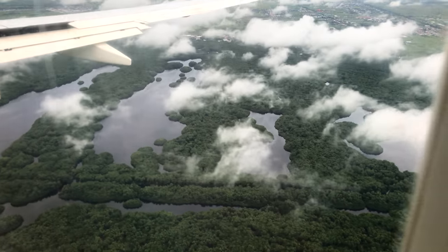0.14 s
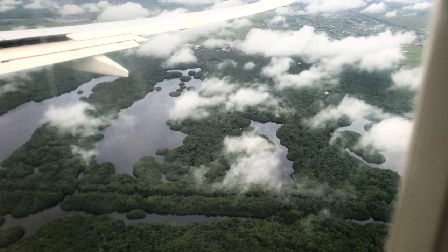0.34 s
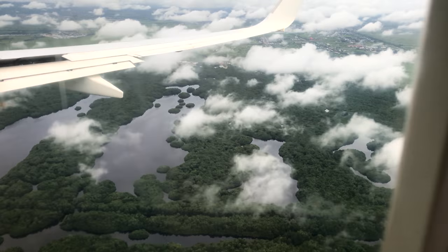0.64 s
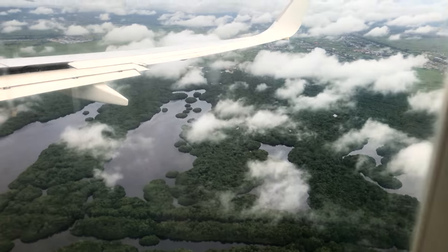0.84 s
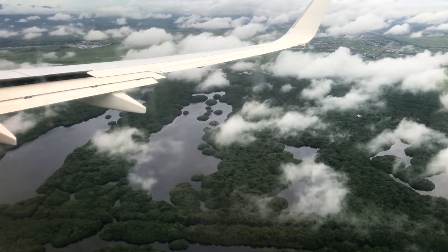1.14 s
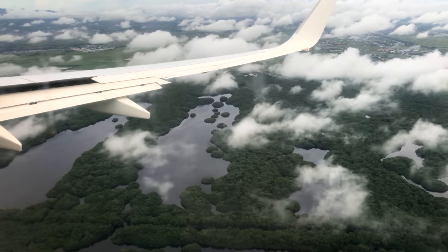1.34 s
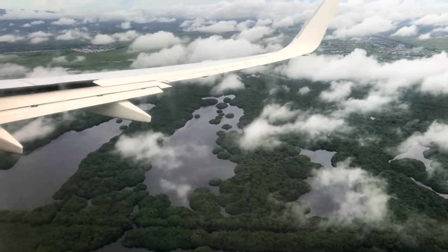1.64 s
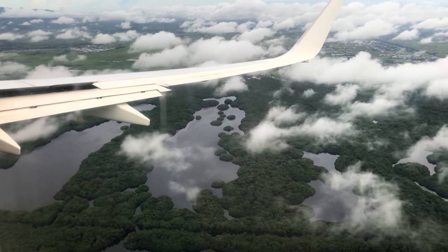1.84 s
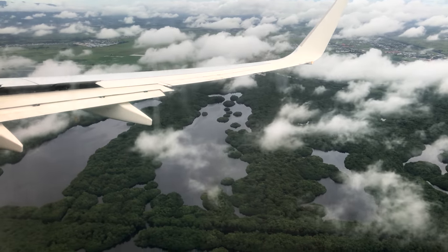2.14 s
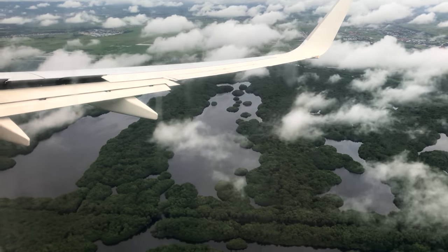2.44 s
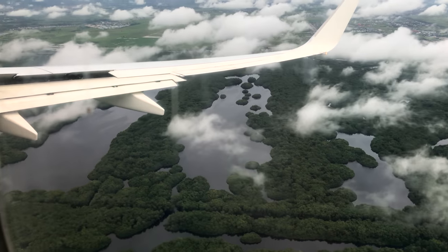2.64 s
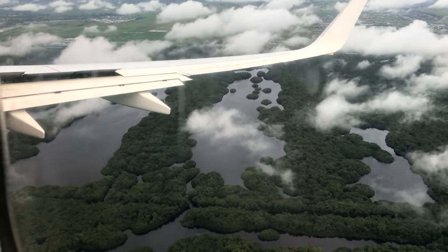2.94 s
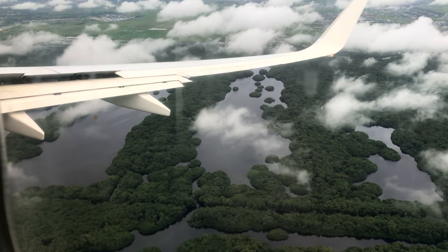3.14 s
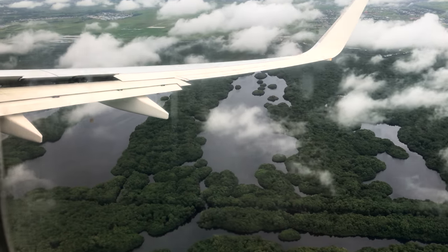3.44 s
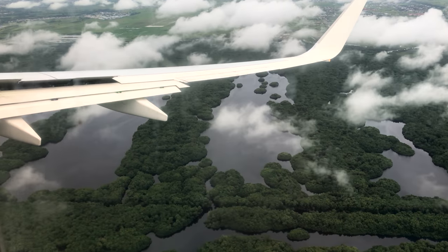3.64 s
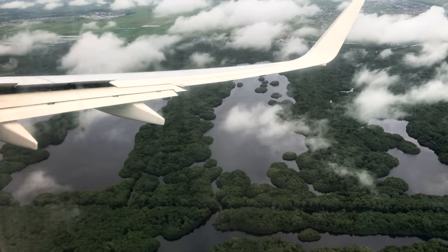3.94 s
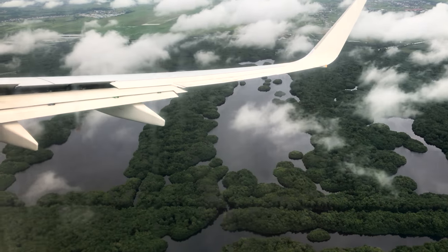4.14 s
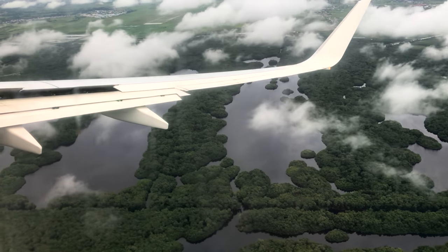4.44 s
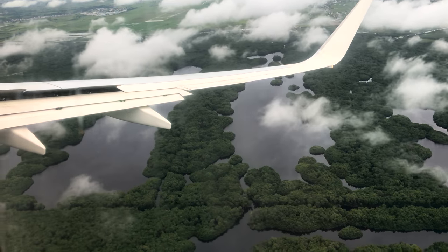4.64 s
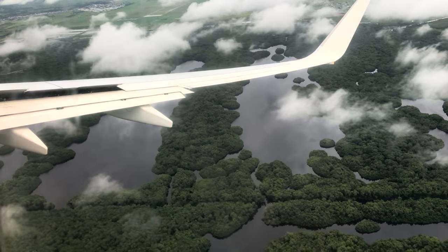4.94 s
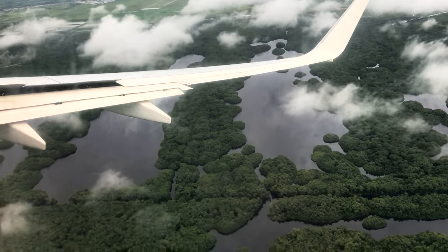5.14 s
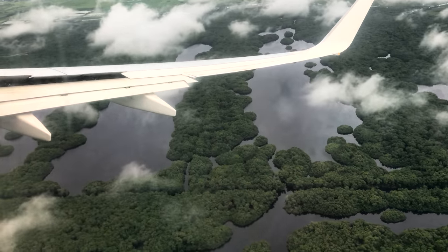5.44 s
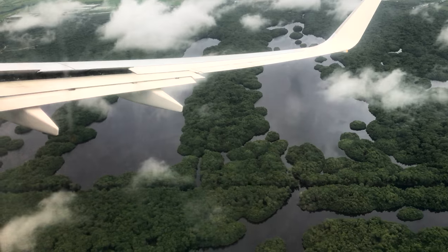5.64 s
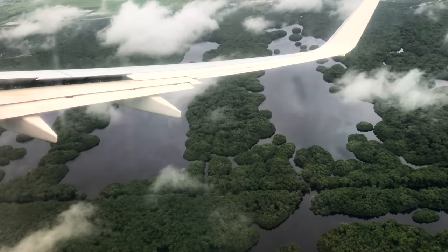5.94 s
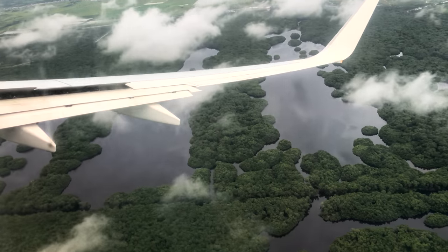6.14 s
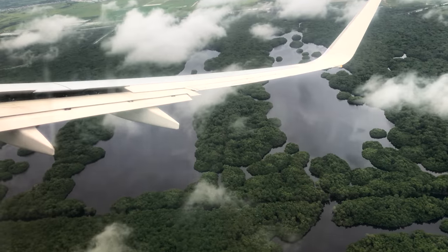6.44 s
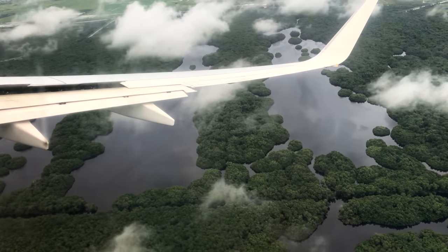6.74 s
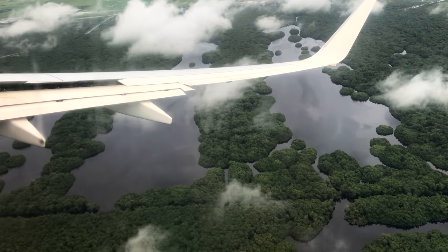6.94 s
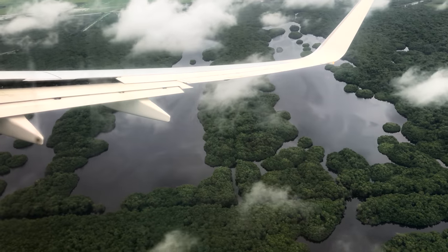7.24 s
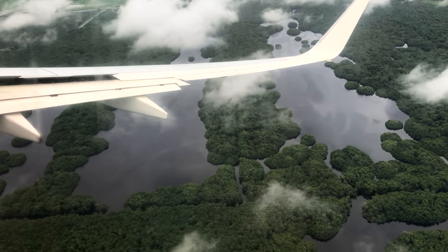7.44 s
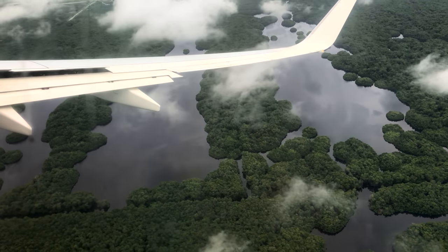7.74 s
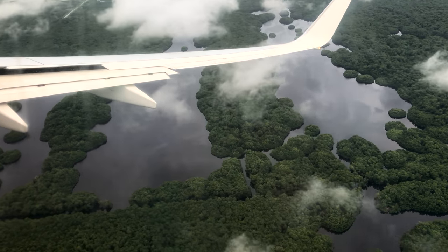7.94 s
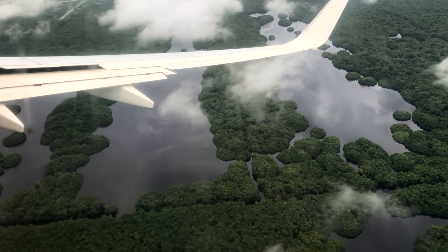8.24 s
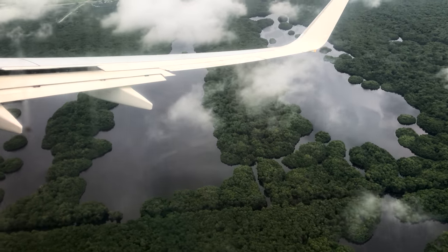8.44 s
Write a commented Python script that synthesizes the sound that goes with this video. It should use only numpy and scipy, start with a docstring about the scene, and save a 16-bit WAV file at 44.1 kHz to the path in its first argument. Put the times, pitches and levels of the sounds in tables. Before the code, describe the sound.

Throughout, a dense low jet roar fills the airliner cabin, with a deep boom around 50 hertz that wavers and beats slowly, soft mid-range rushing air and a faint buried engine hum. A thin hiss near the window shifts slightly in colour around 6 seconds. Over this steady bed a loose trim piece rattles close by, dry and plasticky, about 26 swings a second, each blow with a softer rebound. A hard burst comes at 0.45-0.8 seconds, then the brightest, loudest run at 1.5-1.9. Smaller clusters follow at 2.3-2.75, 3.25-3.4 and 3.7-3.9, a sharp clack at 4.23, and scattered knocks near 5.1 and 5.6. Rattling thickens again at 5.9-6.4, with more knocks at 6.7-7.1, then weakens to dull, sparse knocks and light ticking until the end at about 8.6. The phone microphone slightly rounds the peaks; the roar never stops.

```python
"""Inside an airliner on descent, at a window over the wing, heard through a phone.
Filtered noise makes the jet roar, the cabin boom, the rush of air and vents, and hiss coloured by the window.
Drifting sines hum faintly as the engine shafts. A loose piece of trim swings about 26 times a second:
knocks, light taps and chatter excite its modes, each a noise band under a decaying envelope."""
import sys
import numpy as np
from scipy import signal
from scipy.fft import rfft, irfft, next_fast_len
from scipy.io import wavfile
from scipy.ndimage import uniform_filter1d

SR = 44100
rng = np.random.default_rng(int(sys.argv[2]) if len(sys.argv) > 2 else 0)


def generate_wav(signal):
    """Clip the signal to [-1, 1] and save it as 16-bit WAV at the path in sys.argv[1]."""
    frames = np.transpose(np.atleast_2d(signal))
    scaled = np.clip(frames, -1, 1) * 32767
    pcm = np.round(scaled).astype(np.int16)
    wavfile.write(sys.argv[1], SR, pcm)


N = 378819  # length in samples


def undb(db):
    """dB to gain."""
    return 10 ** (np.asarray(db) / 20)


def level(x, db):
    """Signal scaled to an rms level in dB."""
    return x * undb(db) / np.sqrt(np.mean(x ** 2))


def noise(gain):
    """Noise whose spectrum follows gain(hz); rms 1."""
    size = next_fast_len(N)
    hz = np.maximum(np.arange(size // 2 + 1) * SR / size, 1)
    spectrum = rfft(rng.standard_normal(size)) * gain(hz)
    return level(irfft(spectrum, size)[:N], 0)


def slope(points):
    """Gain curve through (Hz, dB) points joined on a log frequency axis."""
    at_hz, db = np.transpose(points)
    return lambda hz: undb(np.interp(np.log(hz), np.log(at_hz), db))


def peak(centre_hz, width_hz):
    """Gain curve of a resonance passed twice; width_hz spans its -6 dB points."""
    return lambda hz: 1 / (1 + ((hz - centre_hz ** 2 / hz) / width_hz) ** 2)


def walk(rate_hz):
    """Random control values, held for 1 / rate_hz seconds and smoothed twice; rms 1."""
    hold = int(SR / rate_hz)
    steps = np.repeat(rng.standard_normal(N // hold + 1), hold)
    smooth = uniform_filter1d(uniform_filter1d(steps, hold), hold)
    return level(smooth[:N], 0)


def tone(hz, db, drift_hz):
    """A shaft hum: a sine of the given rms level whose pitch drifts a little."""
    phase = 2 * np.pi * np.cumsum(hz + drift_hz * walk(2)) / SR
    return np.sqrt(2) * undb(db) * np.sin(phase)


def fade(power, t60):
    """Power that dies by 60 dB in t60 seconds."""
    return signal.lfilter([1], [1, -np.exp(-2 * np.log(1000) / (t60 * SR))], power)


# Spectrum of the airflow over the skin and from the vents: f/Hz, relative level/dB per Hz
AIR_SPECTRUM = [(250, -5), (400, -2), (520, -1), (607, 0.5), (700, -5), (780, -12), (1060, -12),
                (1290, -22), (1480, -28.5), (1910, -25), (3300, -30.5), (5000, -36), (7100, -46),
                (10300, -47), (15500, -47)]
AIR_DB = -38.5


def air():
    """Rushing air in overlapping bands an octave apart; they swell together and flicker alone, very slightly."""
    out, swell, colour = 0, walk(0.59), slope(AIR_SPECTRUM)
    for mid in 250 * 2. ** np.arange(7):
        share = lambda hz: np.cos(np.pi / 2 * np.clip(np.log2(hz / mid), -1, 1))
        band = lambda hz: colour(hz) * share(hz)
        # the noise has rms 1, so each band gets back its share of the spectrum's power
        weight = np.sqrt(mid * np.mean(band(np.linspace(mid / 2, mid * 2, num=200)) ** 2))
        flicker = undb(0.083 * swell + 0.15 * walk(9))
        out = out + weight * flicker * noise(band)
    return level(out, AIR_DB)


# Spectrum of the roar through the wall, under the resonances: f/Hz, relative level/dB per Hz
ROAR_SPECTRUM = [(20, -28.5), (35, -6), (62, -3.5), (80, 0.5), (110, -3.5), (230, -7.5), (330, -11),
                 (360, -17.5), (450, -26.5), (900, -67.5)]
# Cabin resonances: f/Hz, width/Hz, level against the plain roar/dB
CABIN_RESONANCES = [(120.6, 24.5, -11.5), (289.7, 42.4, -7), (317.1, 13.3, -12), (191, 57, -12.5)]
RUMBLE_DB = -19


def rumble():
    """Jet roar through the wall, lifted at the cabin's resonances."""
    roar = noise(slope(ROAR_SPECTRUM))
    rings = sum(level(noise(peak(hz, width_hz)), db) for hz, width_hz, db in CABIN_RESONANCES)
    return level(roar + rings, RUMBLE_DB)


BOOM_HZ, BOOM_WIDTH_HZ, BOOM_DB = 48.5, 13.3, -19


def boom():
    """The lowest cabin resonance, stirred by the jet, wavers by itself and beats with the fan shaft."""
    ring = peak(BOOM_HZ, BOOM_WIDTH_HZ)
    stirred = noise(lambda hz: ring(hz) ** 2)
    fan_shaft = tone(54.5, db=-7, drift_hz=0.698)  # level against the stirred noise
    return level(stirred + fan_shaft, BOOM_DB)


def core_shaft():
    """The faint, higher hum of the engine's core shaft."""
    return tone(173, db=-33, drift_hz=0.517)


# How the shaking goes: t/s, light tap level/dB, fine chatter level/dB, coloured hiss level/dB
SHAKING = [(0.0, -37, -58, -6), (0.3, -47, -51, -0.5), (0.9, -40, -61, -1.5), (1.3, -46, -62, -3.5),
           (1.7, -45, -58, -2), (2.0, -49, -58, -4), (3.0, -45, -56, -2), (3.56, -46.5, -63, -4.5),
           (4.25, -41.5, -59, 2), (4.78, -46, -61, 0), (5.22, -43, -61, 1), (5.7, -49, -69, 1),
           (6.4, -44, -58, -1), (7.2, -42, -55, 1), (7.5, -43, -62, -0.5), (7.99, -43, -54, 0.5),
           (8.59, -47, -66, 0)]


def shaking():
    """Tap, chatter and hiss levels in dB, joined by straight lines into one value a sample."""
    s, *columns = np.transpose(SHAKING)
    return [np.interp(np.arange(N) / SR, s, column) for column in columns]


# Bands where window and trim colour the hiss: f/Hz, width/Hz, level/dB, gain after the shift/dB
HISS_BANDS = [(1450, 210, -60, 2), (2370, 560, -65.5, 1.5), (3160, 980, -65, -17.5), (3810, 390, -73, 7),
              (4940, 1200, -71, -16.5), (6000, 380, -73, 0), (7020, 540, -72, -1), (8960, 1000, -73, -3),
              (12600, 2600, -73.5, 3)]
SHIFT_S, SHIFT_LENGTH_S = 5.9, 0.3  # middle and tanh time constant of the shift
SWAY_DB = 2.0


def window(hiss_db):
    """Narrow bands of hiss that come and go a little; around SHIFT_S some grow and others dim."""
    shift = .5 + .5 * np.tanh((np.arange(N) / SR - SHIFT_S) / SHIFT_LENGTH_S)
    out = 0
    for hz, width_hz, band_db, shift_db in HISS_BANDS:
        gain = undb(band_db + hiss_db + shift * shift_db + SWAY_DB * walk(4))
        out = out + gain * noise(peak(hz, width_hz))
    return out


# Loud knocks of the trim: t/s, level/dB, brightness/dB per octave around 7 kHz
LOUD_KNOCKS = [(0.0832, -41, -5), (0.187, -42, -7), (0.3591, -45, 1.1), (0.4544, -36, 1.1),
               (0.4953, -26, 2.5), (0.5338, -27, 4), (0.5686, -31, 1.1), (0.6077, -30, 2), (0.747, -35, 5),
               (0.7881, -31.5, 2), (0.8739, -41, -3), (1.01, -38, -2), (1.1483, -38.5, -1),
               (1.4905, -34.5, 0), (1.5314, -24.5, 5.5), (1.5698, -32.5, 1.1), (1.609, -31, -0.5),
               (1.6474, -32, -0.5), (1.6831, -33.5, -2), (1.716, -39, 1.1), (1.7539, -28.5, 2),
               (1.7918, -21.5, 7), (1.8292, -29.5, 0), (1.8701, -27, 1.1), (2.2967, -39, -3),
               (2.3311, -36, -1), (2.606, -36.5, 2), (2.6422, -35, 2), (2.7132, -37, 0), (2.7542, -31, 3),
               (3.2478, -33.5, 0.5), (3.3204, -36.5, 3), (3.3568, -35.5, 0), (3.3945, -37, 4),
               (3.7105, -37, 5), (3.7549, -40, -3), (3.7882, -37, -2), (3.8287, -36.5, -1), (3.868, -35, 0),
               (4.1949, -37, -1), (4.2348, -25.5, 4), (4.2722, -29.5, 0), (4.3086, -35, 0),
               (4.4867, -36.5, -3), (4.9816, -37.5, -2), (5.1208, -34.5, -1), (5.1597, -32.5, 3),
               (5.5706, -37, 3), (5.9414, -31.5, 1.1), (5.9793, -34, 1.1), (6.0172, -30, 0.5),
               (6.205, -30, 3), (6.2456, -25.5, 4), (6.2821, -32, -1), (6.321, -30, 2), (6.3574, -38, 1.1),
               (6.4118, -41, 1.1), (6.6932, -32, 2), (6.8258, -32, 1.1), (6.865, -31, -0.5),
               (6.9661, -39, -2), (6.997, -39, -2), (7.039, -31.5, 1), (7.0758, -36, 4), (7.223, -40, -1),
               (7.2729, -45, 1.1), (7.3068, -40, -4), (7.6899, -41, -3), (7.8487, -37, -3),
               (7.9099, -36, -3), (8.3374, -44, 1.1), (8.5435, -40, -4)]
RATTLE_HZ = 26.47  # swings a second, with a tap at both ends
TAP_SCATTER_S, TAP_SCATTER_DB = 0.006, 3.5
TAP_BRIGHT_DB, BRIGHT_SCATTER_DB = -2.5, 1.5  # per octave
REBOUND_DB, REBOUND_SCATTER_DB = -15, 2.5  # against the blow itself


def knocks(tap_db):
    """Times, levels, brightness and rebound levels of the loud knocks and of the light taps in the gaps."""
    loud_s, loud_db, loud_bright_db = np.transpose(LOUD_KNOCKS)
    # time, level, brightness; most taps fall below the tap level
    chance = rng.standard_normal((N // 500, 3)) - [0, 1, 0]
    tap_s = np.abs(np.arange(len(chance)) / (2 * RATTLE_HZ) + TAP_SCATTER_S * chance[:, 0])
    gap_s = np.abs(tap_s[:, None] - loud_s).min(axis=1)
    free = (gap_s > 1 / (3 * RATTLE_HZ)) & (tap_s < (N - 1) / SR)
    tap_s, chance = tap_s[free], chance[free]
    s = np.append(loud_s, tap_s)
    db = np.append(loud_db, tap_db[(tap_s * SR).astype(int)] + TAP_SCATTER_DB * chance[:, 1])
    bright_db = np.append(loud_bright_db, TAP_BRIGHT_DB + BRIGHT_SCATTER_DB * chance[:, 2])
    rebound_db = REBOUND_DB + REBOUND_SCATTER_DB * rng.standard_normal(len(s))
    return s, db, bright_db, np.minimum(rebound_db, 0)


STIR_DB, STIR_S = -27, 0.15  # chatter stirred by a blow: level against it, length
CHATTER_RATE_HZ = 170  # mean ticks a second


def chatter_ticks(s, db, buzz_db):
    """Random fine ticks, stronger around hard blows."""
    stir = np.zeros(N)
    np.add.at(stir, (s * SR).astype(int), undb(db + STIR_DB) ** 2 * STIR_S * SR)
    stirred_power = np.abs(uniform_filter1d(stir, int(STIR_S * SR)))
    buzz = np.sqrt(undb(buzz_db) ** 2 + stirred_power)
    ticks = rng.random(N) < CHATTER_RATE_HZ / SR
    return ticks * buzz * undb(3.1 * np.minimum(rng.exponential(size=N), 3))


REBOUND_S = 0.0172  # mean delay
RING_DB = -13.5  # share of a knock's level that one mode carries
# taps and chatter favour one thin band; THIN_DB is its contrast with modes far outside
THIN_HZ, THIN_WIDTH_HZ, THIN_DB = 6570, 1800, 4.5
SNAP_DB, SNAP_T60_S = 2.1, 0.0095  # start of every ring
TAIL_DB, TAIL_T60_S = -16, 0.13  # what it leaves in the cabin
# Modes the trim rings with: f/Hz, width/Hz, level/dB, t60/s
TRIM_MODES = [(1010, 290, 0, 0.066), (1550, 610, -6, 0.14), (2410, 1800, -9.5, 0.047),
              (3780, 2300, -6, 0.093), (4540, 830, -10.5, 0.053), (5830, 1500, -6, 0.05),
              (6600, 900, -6, 0.027), (7250, 860, -7, 0.037), (8500, 1700, -3.5, 0.024),
              (9750, 840, -12.5, 0.034), (11300, 1500, -11.5, 0.027), (13200, 1300, -14, 0.03),
              (14800, 1400, -14, .03)]


def trim(tap_db, buzz_db):
    """Each blow and its softer rebound shake the trim's crowded modes; faint chatter runs between."""
    s, db, bright_db, rebound_db = knocks(tap_db)
    late_s = REBOUND_S * (1 + 0.19 * rng.standard_normal(len(s)))
    blow_at = (s * SR).astype(int)
    rebound_at = np.minimum((s + late_s) * SR, N - 1).astype(int)
    chatter = chatter_ticks(s, db, buzz_db)
    out = 0
    for hz, width_hz, mode_db, t60 in TRIM_MODES:
        # a harder contact tips the ring towards the treble; no two blows land alike
        tilt_db = bright_db * max(np.log2(hz / 7000), -1)
        size = undb(db + tilt_db + 1.05 * rng.standard_normal(len(s)))
        thin = undb(THIN_DB * (peak(THIN_HZ, THIN_WIDTH_HZ)(hz) - .5))
        size[len(LOUD_KNOCKS):] *= thin  # light taps only
        blows = (chatter * thin) ** 2
        np.add.at(blows, blow_at, size ** 2)
        np.add.at(blows, rebound_at, (size * undb(rebound_db)) ** 2)
        snap = undb(2 * SNAP_DB) * fade(blows, SNAP_T60_S)  # doubled dB: these are powers
        tail = undb(2 * TAIL_DB) * fade(blows, TAIL_T60_S)
        ring = fade(blows, t60) + snap + tail
        rise = np.exp(-hz / (3.0 * SR))  # three cycles: low modes take longer to speak
        power = signal.lfilter([1 - rise], [1, -rise], ring)
        out = out + undb(mode_db) * np.sqrt(power) * noise(peak(hz, width_hz))
    return undb(RING_DB) * out


def scene():
    """Everything reaches one microphone."""
    tap_db, buzz_db, hiss_db = shaking()
    background = air() + rumble() + boom() + core_shaft()
    return (background + window(hiss_db) + trim(tap_db, buzz_db))[None]


def record(dry):
    """The phone rounds the loudest peaks and cuts the top above 15740 Hz."""
    rounded = np.tanh(1.36 * dry) / 1.21
    top_cut = signal.ellip(16, .3, 60, 15740, fs=SR, output="sos")
    return signal.sosfilt(top_cut, rounded)


dry = scene()
out = record(dry)
generate_wav(out)
```